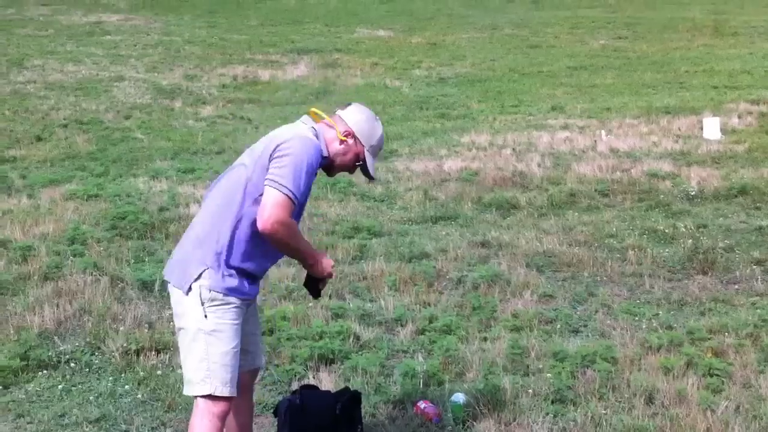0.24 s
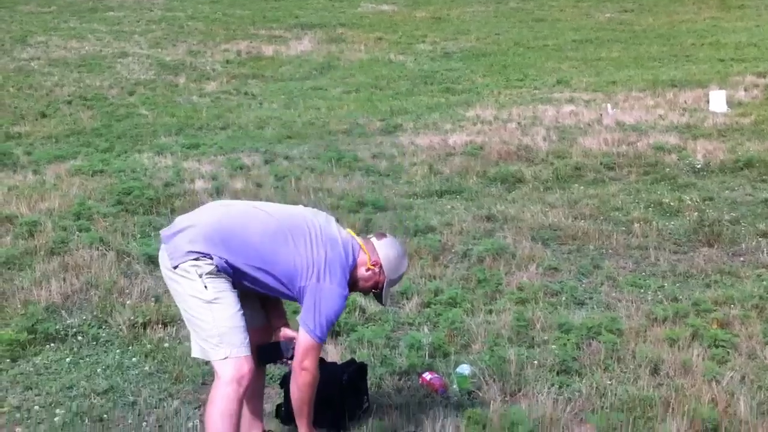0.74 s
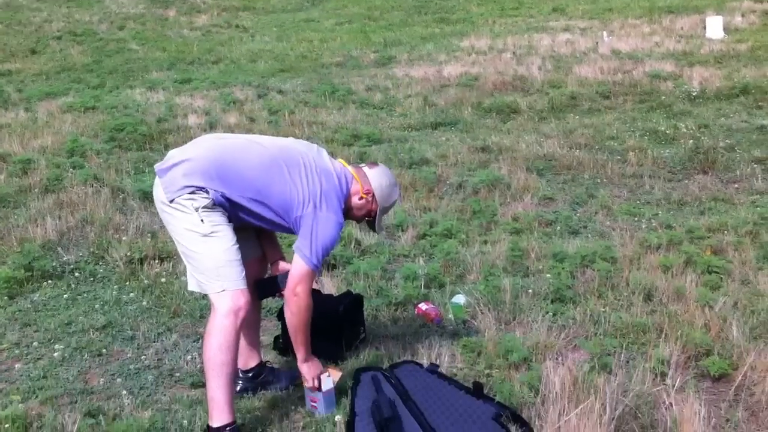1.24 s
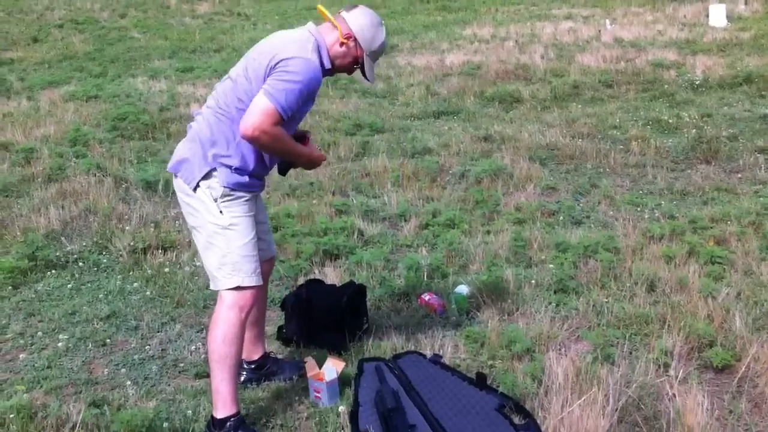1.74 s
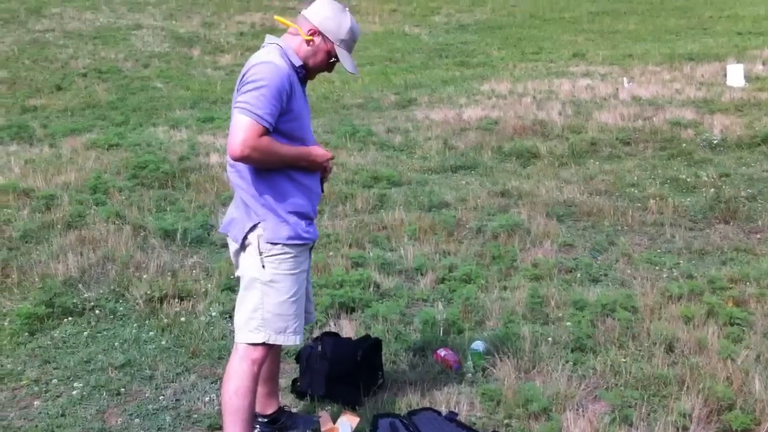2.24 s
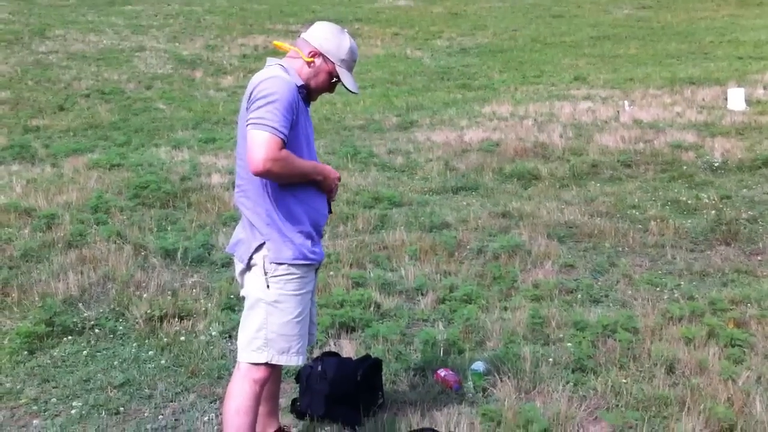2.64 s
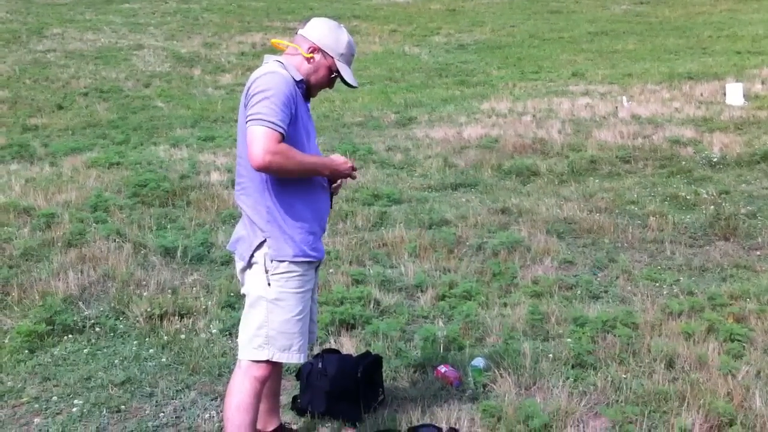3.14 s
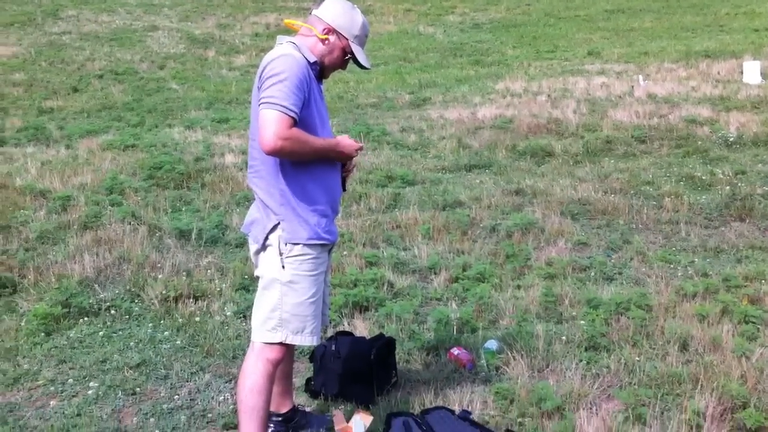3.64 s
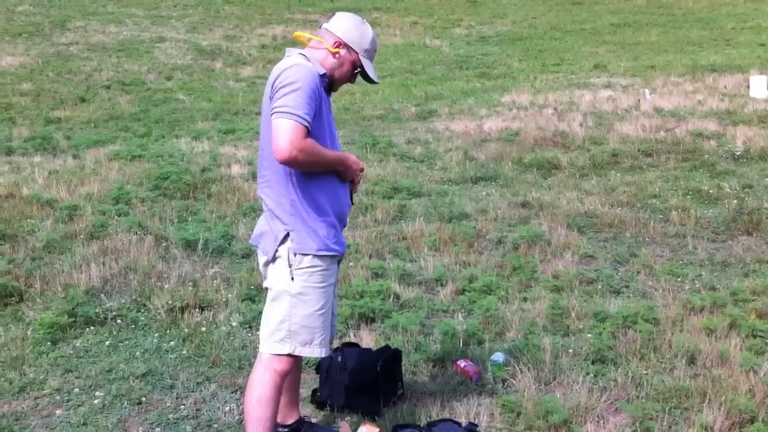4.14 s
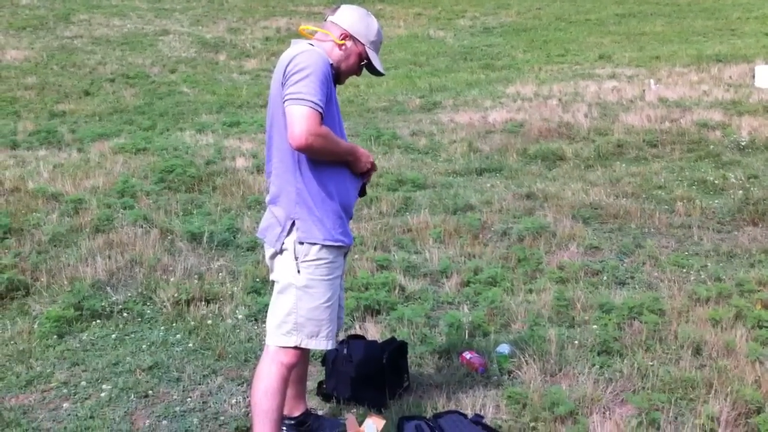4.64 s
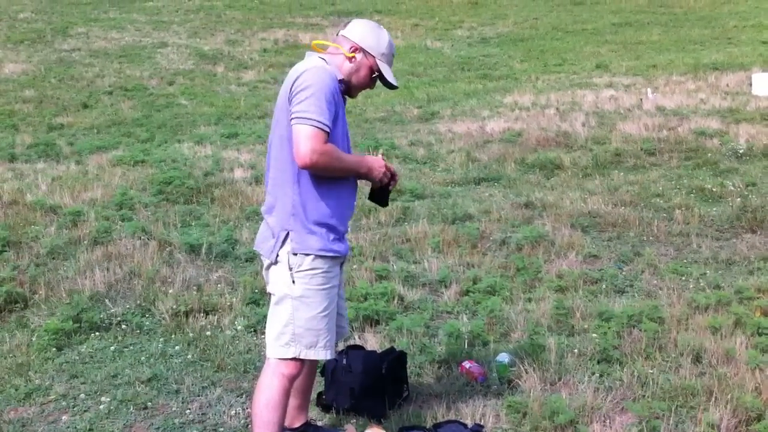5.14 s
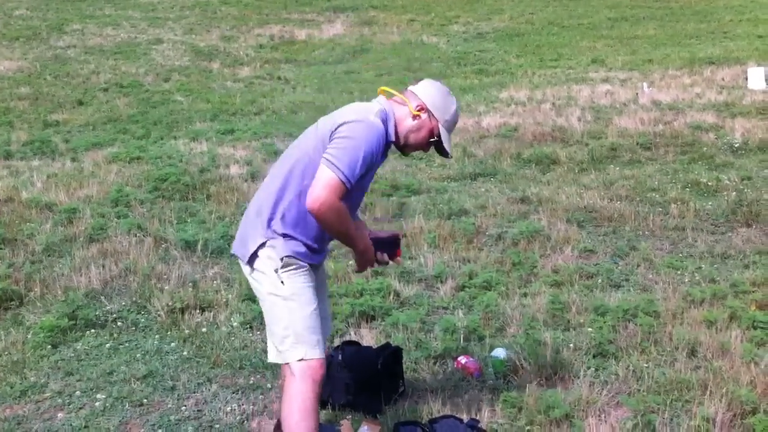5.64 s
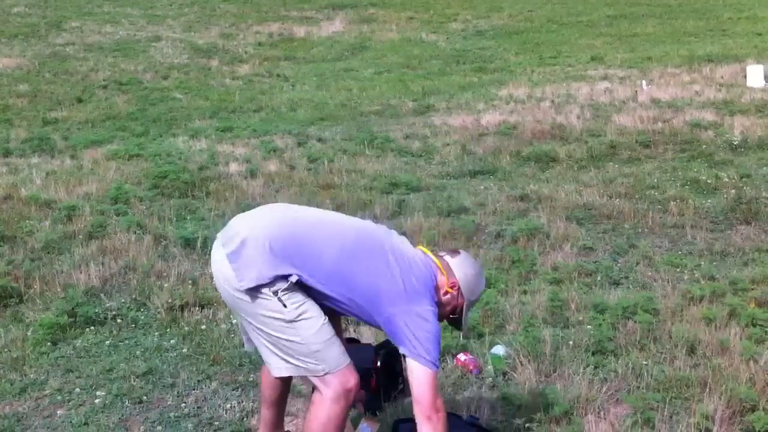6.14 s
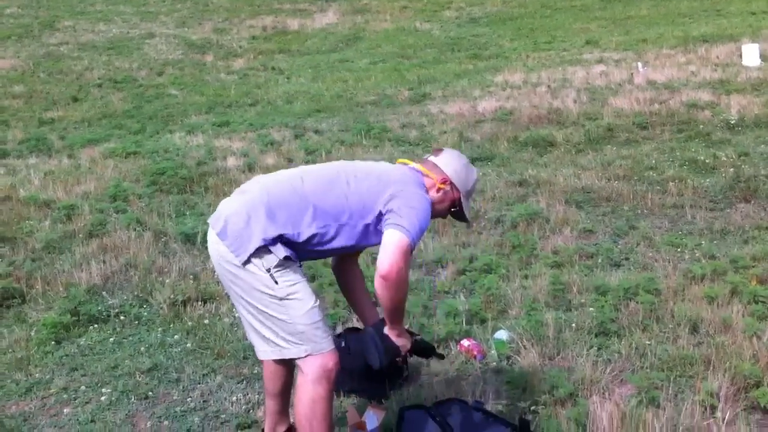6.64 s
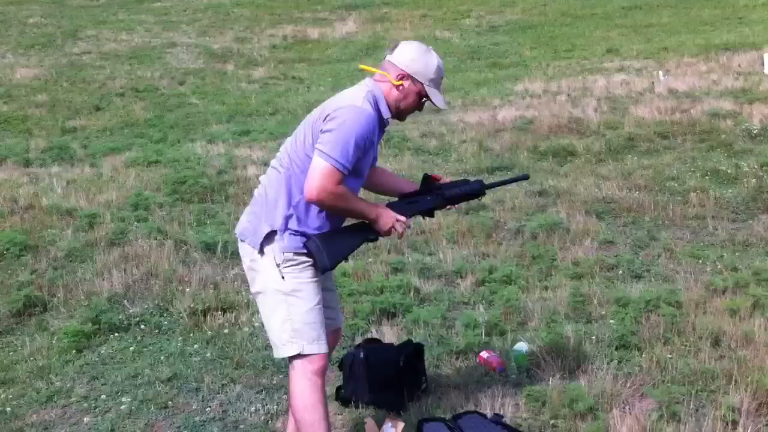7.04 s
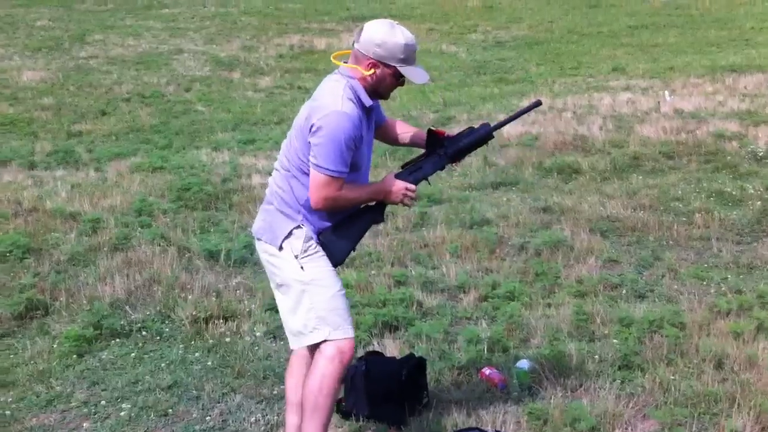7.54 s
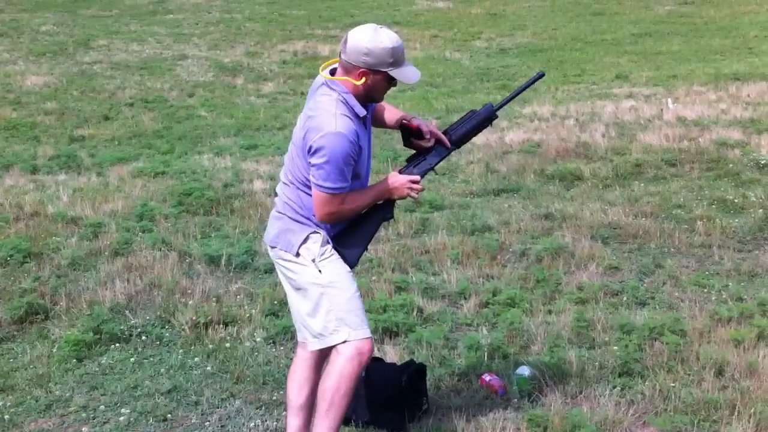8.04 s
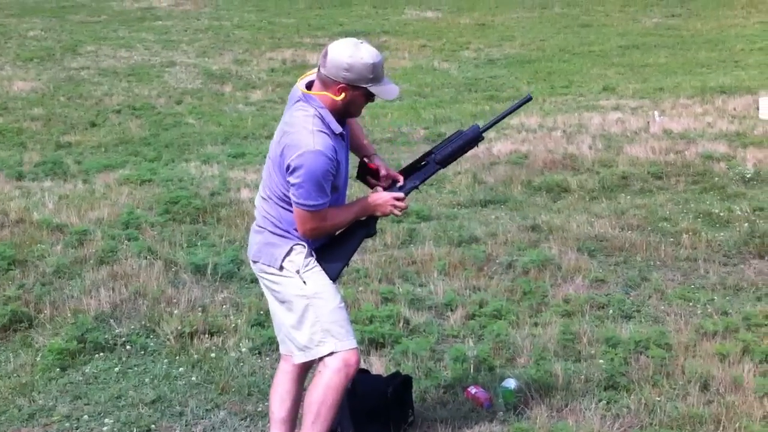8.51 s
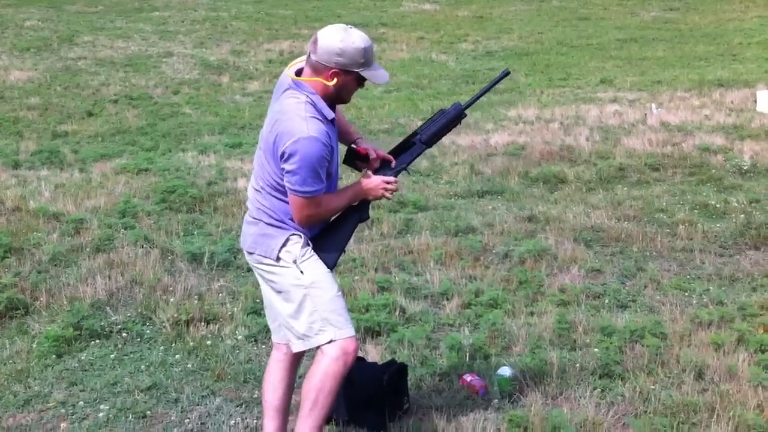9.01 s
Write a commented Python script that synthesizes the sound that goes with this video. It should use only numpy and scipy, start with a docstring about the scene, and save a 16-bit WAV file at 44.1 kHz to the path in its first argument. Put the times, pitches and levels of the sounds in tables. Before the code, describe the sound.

A quiet open field, with softly moving air, thin steady high hiss and faint distant birds: two-note calls and chirps in the first two seconds, repeated rising notes from about 3.3 to 5.5, then a quickening run of high whistles from 5.7 to about 7.5. Shells snap into a box magazine at 0.23 and 0.39. Fingers rummage and tap in a cardboard carton from 0.9 to 1.3. After a lull, light ticks at 2.4 lead to a dull press at 2.7 and crisp snaps at 2.9 and 3.06. Small fiddling ticks run from 3.9 to 4.8, with a final snap at 4.97. Grass and clothes brush from 5.0 to 6.8, with a soft foot thud near 6.0, and again at 7.2. From 8.43 the magazine grates into a gun with metallic clicks and a bright ping, clacking loudest at 8.64; more scraping follows at 8.8 and 9.1, and a second firm clack at 9.21. Close, dry, barely any echo.

```python
"""Loading a box magazine in a field

A man presses shotgun shells into a box magazine: each rubs past the lips and snaps home.
He takes a shell from a carton, shifts in the grass, and works the magazine into a gun with scrapes and clacks.
Blows excite damped modes; rubs are trains of stick-slip impulses filtered by a body's impulse response.
Birds are gliding sinusoids blurred by scattering; moving air and a thin steady hiss are filtered noise."""
import sys
import numpy as np
from scipy import signal
from scipy.fft import rfft, irfft
from scipy.io import wavfile
from scipy.ndimage import map_coordinates

SR = 44100
rng = np.random.default_rng(int(sys.argv[2]) if len(sys.argv) > 2 else 0)


def materialize(psi):
    """Save the field psi as 16-bit PCM at rate SR to the path in sys.argv[1].

    A 1-D psi becomes a single channel; in a 2-D psi each row is a channel.
    """
    bounded = np.clip(np.atleast_2d(psi).T, -1, 1)
    quanta = np.round(bounded * 32767).astype(np.int16)
    wavfile.write(sys.argv[1], SR, quanta)


N = 408807
TIME = np.arange(N) / SR  # the whole scene [s]
RING = np.arange(4096) / SR  # time after one blow [s]


def undb(db):
    """Amplitude ratio: 20 dB is a factor of ten."""
    return 10 ** (np.asarray(db) / 20)


def unit(x):
    """Normalisation to a root-mean-square value of 1."""
    return x / np.sqrt(np.mean(x ** 2) + 1e-30)


def add(out, s, x):
    """Superposition: mix x into out from time s, trimmed at both ends of the scene."""
    i = int(s * SR)
    x, i = x[max(-i, 0):], max(i, 0)
    out[i:i + len(x)] += x[:max(N - i, 0)]


def colour(x, points):
    """Linear filtering by a spectrum of points (frequency [Hz], gain [dB]), joined on a log-frequency axis."""
    hz, db = np.transpose(points)
    f = np.fft.rfftfreq(len(x), 1 / SR) + 1
    gain = undb(np.interp(np.log(f), np.log(hz), db))
    return irfft(rfft(x) * gain, len(x))


def walk(n, rate):
    """Slow fluctuation: random values, rate of them per second, joined smoothly; spread near 1."""
    steps = rng.standard_normal(4096)
    return map_coordinates(steps, [np.arange(n) * rate / SR], order=2, mode="wrap")


def ring(modes, bright, spot_hz, spot_db, rattle_db, rattle_t60_s):
    """Modal impact: a blow excites damped modes, struck again by a short chatter of loose parts."""
    tone = 0
    for hz, width, db in modes:
        # where the body is struck decides which modes speak
        spot = np.exp(-(np.log2(hz / spot_hz) / 0.18) ** 2)
        # harder contact favours the high modes (bright in dB per octave)
        gain = undb(db + bright * np.log2(hz / 2000) + spot_db * spot)
        # the grip shifts each mode a little
        hz = hz * (1 + 0.003 * rng.standard_normal())
        decay = np.exp(-np.pi * width * RING)
        tone = tone + gain * width * decay * np.sin(2 * np.pi * (hz * RING + rng.random()))
    tone = tone * (1 - np.exp(-RING / 0.00015))  # the contact takes a moment to build
    chatter = rng.standard_normal(len(RING)) * np.exp(-np.log(1000) * RING / rattle_t60_s)
    rattle = signal.fftconvolve(tone, chatter)[:len(RING)]
    return unit(tone) + undb(rattle_db) * unit(rattle)


def knocks(table, modes, spot_db, rattle_db, rattle_t60_s):
    """Impacts on one body, each scaled by its energy as if spread over 4 ms."""
    out = np.zeros(N)
    for s, db, bright, spot_hz in table:
        blow = ring(modes, bright, spot_hz, spot_db, rattle_db, rattle_t60_s)
        add(out, s, undb(db) * blow * np.sqrt(.004 * SR / np.sum(blow ** 2)))
    return out


def touches(table):
    """Contact hardness: light blows (time, level, favoured frequency) ring brighter at higher-pitched spots."""
    hardness, neutral_hz = 7.2, 2600  # dB per octave for each octave above the neutral spot
    return [(s, db, hardness * np.log2(max(hz, 700) / neutral_hz), hz) for s, db, hz in table]


def ticks(start, end, rate, db, hz, spread_db, spread_octaves):
    """Random contacts (time, level, favoured frequency) at uneven gaps through a spell."""
    chance = rng.uniform(-0.88, 1, size=(64, 3))
    rows = []
    for k, (when, force, spot) in enumerate(chance):
        s = start + (k + .5 + when / 2) / rate
        rows.append((s, db + spread_db * force, hz * 2 ** (spread_octaves * spot)))
    return [row for row in rows if row[0] < end]


def slips(n, rate, spread_db, catch_db):
    """Stick-slip friction: tiny uneven impulses whose strength swells in bunches."""
    chance, size = rng.random(N)[:n], rng.uniform(-1.13, 1, N)[:n]
    strength = undb(spread_db * np.abs(size) + catch_db * walk(n, 199))
    return (chance < rate / SR) * np.sign(size) * strength


def rubs(table, body, rate, spread_db, catch_db, swell):
    """Friction strokes: slips convolved with a body's impulse response, under a time-varying pressure."""
    out = np.zeros(N)
    for start, peak, end, db, bright in table:
        t = np.arange(start, max(end, start + .01), 1 / SR)
        # each new hold retunes the body a little
        grip = 1 + 0.029 * rng.standard_normal()
        response = np.interp(RING * grip, RING, body, right=0)
        scrape = signal.fftconvolve(slips(len(t), rate, spread_db, catch_db), response)[:len(t)]
        scrape = colour(scrape, [(250, -3 * bright), (16000, 3 * bright)])  # six octaves
        pressure = np.interp(t, [start, peak, end], [0, 1, 0]) ** swell
        add(out, start, undb(db) * unit(scrape) * pressure)
    return out


def background():
    """Shaped noise: softly moving air, slowly wandering in level, under an even high hiss."""
    # spectrum of the moving air: (frequency [Hz], level [dB])
    air_spectrum = [(15, -68), (25, -25.5), (33, -25), (80, -18), (104, -6.5), (177, 0.5), (511, -8),
                    (716, -11.5), (911, -10), (1130, -14), (1410, -13), (1970, -15), (2230, -15),
                    (2900, -16.5), (8000, -21.5), (10400, -44.5), (17600, -120)]
    # spectrum of the thin hiss: (frequency [Hz], level [dB])
    hiss_spectrum = [(6500, -20), (8000, -14), (8900, -9.5), (9650, 0), (10400, -8.5), (11200, -14),
                     (12500, -11), (13400, -9), (15800, -9)]
    air_db, hiss_db = -64, -64.5
    air = unit(colour(rng.standard_normal(N), air_spectrum))
    air = air * undb(air_db + 0.13 * walk(N, 2.5) + .5 * walk(N, 12))
    return air + undb(hiss_db) * unit(colour(rng.standard_normal(N), hiss_spectrum))


def song(count):
    """Geometric approach: the gap and pitch of high whistles close in on last values by the same share each note."""
    start_s, first_gap_s, last_gap_s, shrink = 5.735, .345, .09, .7
    first_hz, last_hz = 4110, 3670
    duty = 0.62  # share of each gap that is sung
    glide_hz, glide_step_hz = 170, -37  # early notes rise; later ones fall more and more
    peak_db, peak_s, fade_db_per_s = -64, 6.95, 9  # swells towards the peak and fades after it
    notes, s = [], start_s
    for k in range(count):
        left = shrink ** k
        gap = last_gap_s + (first_gap_s - last_gap_s) * left
        hz = last_hz + (first_hz - last_hz) * left
        glide = glide_hz + glide_step_hz * k
        shape = [(0, hz - glide / 2), (duty * gap, hz + glide / 2)]
        notes.append((s, shape, peak_db - fade_db_per_s * abs(s - peak_s)))
        s += gap
    return notes


def upslurs(count):
    """Slowing repetition: one rising note recurs, each gap a little longer than the last."""
    # pitch contour of the rising note: (time after its start [s], frequency [Hz])
    rising_note = [(0, 2026), (.02, 2145), (.04, 2520), (.06, 2760)]
    start_s, gap_s, slowing_s, db = 3.256, .358, .008, -59.5  # slowing is added to each further gap
    return [(start_s + k * (gap_s + slowing_s * (k - 1) / 2), rising_note, db) for k in range(count)]


def birds():
    """Frequency modulation: far whistles are wavering gliding sinusoids, smeared by scattering over the field."""
    # two-note calls, low sliding up to high: (time [s], level of the high note [dB])
    two_note_calls = [(-.07, -64.5), (.266, -59.5), (.688, -57), (1.208, -58.5)]
    # contours of their two notes: (time after the call's start [s], frequency [Hz])
    low_note = [(0, 2780), (.04, 2700), (.068, 2850)]
    high_note = [(.052, 2990), (.08, 3156), (.146, 3210)]
    low_note_db = -6.5  # against the high note
    # contour of a chirp that rises and drops: (time after its start [s], frequency [Hz])
    chirp_shape = [(0, 2053), (.035, 2380), (.048, 2048), (.075, 1780)]
    # its repeats: (time [s], level [dB])
    chirps = [(.085, -64), (.487, -62), (.94, -65), (1.48, -65)]
    # contour of a low, slightly sagging note: (time after its start [s], frequency [Hz])
    low_whistle = [(0, 1741), (.075, 1669)]
    # its repeats: (time [s], level [dB])
    low_whistles = [(3.41, -69), (4.019, -67), (4.33, -67), (4.5, -66), (4.89, -67), (5.69, -66.5)]
    # short gliding whistles and, in the last row, a faint brief tone near 2.2 kHz:
    # (time [s], first frequency [Hz], glide [octaves], level [dB])
    brief_tones = [(6.11, 3090, .14, -63), (6.22, 2100, .09, -64.5), (6.28, 2620, -0.14, -59.5),
                   (6.42, 3135, 0.076, -61.5), (6.51, 2060, .06, -70), (8.035, 2090, 0.096, -69),
                   (8.36, 2220, .04, -64)]
    brief_tone_s = .058

    notes = song(count=13) + upslurs(count=7)
    for s, db in two_note_calls:
        notes += [(s, low_note, db + low_note_db), (s, high_note, db)]
    notes += [(s, chirp_shape, db) for s, db in chirps]
    notes += [(s, low_whistle, db) for s, db in low_whistles]
    notes += [(s, [(0, hz), (brief_tone_s, hz * 2 ** octaves)], db) for s, hz, octaves, db in brief_tones]
    out = np.zeros(N)
    for s, shape, db in notes:
        when, pitch = np.transpose(shape)
        n = int((when[-1] - when[0]) * SR)
        hz = np.interp(when[0] + TIME[:n], when, pitch) * (1 + .008 * walk(n, 220))
        flutter = undb(db + 2.1 * walk(n, 114)) * signal.windows.tukey(n, .5)
        add(out, s + when[0], flutter * np.sin(2 * np.pi * np.cumsum(hz) / SR))
    # nearby grass blurs each note; distant trees leave a longer tail
    t = TIME[:SR]
    scatter = rng.standard_normal(SR) * (np.exp(-t / 0.016) + 0.26 * np.exp(-t / 0.25))
    blurred = signal.fftconvolve(out, scatter / np.linalg.norm(scatter))[:N]
    return undb(-2.5) * out + undb(-1.5) * blurred


def grass():
    """Dense friction: stalks and cloth brush in many small slips as he shifts his weight, with one foot thud."""
    # shoes and clothes brushing, and a short foot thud at 5.98 s that is cut off at its end while still rising:
    # (start [s], time the pressure rises towards [s], end [s], level [dB], brightness [dB per octave])
    brushes = [(5.04, 5.2, 5.28, -53.5, -1.5), (5.24, 5.32, 5.42, -56.5, -2), (5.5, 5.75, 6.2, -66.5, 4),
               (5.98, 6.015, 6, -48, -1.5), (5.94, 6.06, 6.17, -53.5, 1), (6.2, 6.36, 6.8, -63, 2),
               (7.14, 7.25, 7.49, -54.5, 2)]
    # spectrum of shoes and cloth in dry grass: (frequency [Hz], level [dB])
    grass_spectrum = [(80, -29), (180, 0.5), (290, -0.5), (420, 4.5), (650, -8.5), (1100, -5), (1700, -9.5),
                      (2300, -6), (4500, -13.5), (6500, -23.5), (10000, -16), (15000, -31)]
    stalk = colour(signal.unit_impulse(len(RING), idx=256), grass_spectrum)
    return rubs(brushes, stalk, rate=3500, spread_db=9.5, catch_db=1.0, swell=0.84)


def carton():
    """Small radiator: fingers rummage in a cardboard box and lift a shell; the box gives no deep bass."""
    # resonances of the shell carton: (frequency [Hz], width [Hz], level [dB])
    carton_modes = [(292, 120, 0.5), (955, 130, 1.5), (1420, 240, -1.5), (2250, 470, -5.5), (3350, 480, -3),
                    (4380, 210, -5.5), (8200, 2400, -14.5)]
    # shells tapping the carton: (time [s], level [dB], frequency favoured by the struck spot [Hz])
    taps = [(1.0506, -39, 3400), (1.074, -37.5, 4520), (1.062, -53, 3200), (1.0765, -45.5, 280),
            (1.088, -42.5, 3400), (1.094, -46.5, 280), (1.1115, -51, 2300)]
    # spells of rummaging: (start [s], strongest [s], end [s], level [dB], brightness [dB per octave])
    rummages = [(.86, 0.959, 1.03, -57, -.5), (1.015, 1.068, 1.156, -53, -.5),
                (1.149, 1.221, 1.32, -63, 2.5)]
    tick_rate, tick_db, tick_hz = 28, -55.5, 2000  # loose shells touch as the fingers stir them; per second
    body = ring(carton_modes, 0, spot_hz=1210, spot_db=4, rattle_db=3, rattle_t60_s=0.051)
    blows = touches(taps)
    for start, peak, end, db, bright in rummages:
        stirred = ticks((start + peak) / 2, (peak + end) / 2, tick_rate, tick_db, tick_hz,
                        spread_db=4, spread_octaves=.6)
        blows += touches(stirred)
    box = knocks(blows, carton_modes, spot_db=11.5, rattle_db=-5, rattle_t60_s=0.027)
    box = box + rubs(rummages, body, rate=420, spread_db=19, catch_db=2, swell=0.59)
    return signal.sosfilt(signal.butter(2, 150, "high", fs=SR, output="sos"), box)


def gun():
    """Coupled resonators: the magazine grates along the well, flicks the catch spring, strikes home and rebounds."""
    # resonances of the gun's receiver: (frequency [Hz], width [Hz], level [dB])
    receiver_modes = [(401, 44, -23), (481, 49, -8.5), (777, 27, -12.5), (836, 57, -12), (1030, 80, -16),
                      (1260, 260, -12), (1497, 320, -9), (2177, 350, -2.5), (2320, 140, -9.5),
                      (2620, 280, -6), (2830, 81, -11), (3100, 230, -11.5), (3890, 180, -8),
                      (4580, 160, -11), (5700, 630, -18.5), (7900, 1400, -19), (9000, 570, -19),
                      (10350, 530, -15), (11660, 1000, -16), (14200, 1200, -28)]
    # resonances of the magazine wall sliding in the well: (frequency [Hz], width [Hz], level [dB])
    wall_modes = [(480, 54, -2), (780, 43, -12), (893, 70, 0.5), (1150, 115, -24), (1620, 110, -10),
                  (2347, 68, 6.5), (2580, 76, -2), (2877, 93, 3.5), (3174, 100, -1.5), (3900, 150, -9),
                  (4660, 610, -4.5), (5700, 160, -14.5), (7780, 650, -13.5), (9180, 290, -5),
                  (10100, 460, -8.5), (12000, 500, -11), (13800, 1200, -17)]
    # lighter metal blows: (time [s], level [dB], frequency favoured by the struck spot [Hz])
    clicks = [(8.428, -33, 3600), (8.4445, -32, 3180), (8.505, -32, 2620), (8.5352, -39, 1320),
              (8.560, -35, 3400), (8.629, -30, 1900), (8.6724, -44, 2200), (8.808, -46, 1890),
              (8.883, -32.5, 2800), (8.9453, -41.5, 3800), (8.990, -50, 2700), (9.008, -46, 3400),
              (9.1388, -30, 4300), (9.160, -32, 3480)]
    # the magazine latches:
    # (time [s], level [dB], brightness [dB per octave], frequency favoured by the struck spot [Hz])
    latches = [(8.6392, -10, 1.5, 2250), (9.214, -15.5, 0, 2180)]
    # strokes of the magazine in the well, and one faint rub of the hand (at 8.92 s):
    # (start [s], strongest [s], end [s], level [dB], swell exponent [1]: low is even pressure, high is peaked)
    strokes = [(8.432, 8.465, 8.521, -31, .35), (8.553, 8.587, 8.655, -28.5, .8),
               (8.795, 8.884, 8.932, -28.5, 1.2), (8.92, 9.06, 9.2, -58, .5),
               (9.082, 9.114, 9.135, -27, 1.1), (9.133, 9.16, 9.179, -30.5, .9),
               (9.188, 9.205, 9.24, -41, .9)]
    # pings of the catch spring: (time [s], level [dB])
    pings = [(8.445, -26), (8.505, -18)]
    ping_hz, ping_t60_s = 9490, 0.027
    rebound_s, rebound_db, rebound_bright = .008, -19.5, -4  # one weaker, duller rebound (dB per octave)
    stroke_bright = .1  # dB per octave
    grit_per_s, grit_db, grit_hz = 130, -11, 2880  # small catches in mid-stroke; dB against the stroke
    receiver_db = -5.5  # the receiver rings along with the sliding wall

    blows = touches(clicks)
    for s, db, bright, hz in latches:
        blows += [(s, db, bright, hz),
                  (s + rebound_s, db + rebound_db, bright + rebound_bright, hz)]
    out = np.zeros(N)
    for start, peak, end, db, swell in strokes:
        wall = ring(wall_modes, bright=0.7, spot_hz=2870, spot_db=2, rattle_db=-2.5, rattle_t60_s=0.022)
        receiver = ring(receiver_modes, bright=0, spot_hz=480, spot_db=7, rattle_db=-1.5, rattle_t60_s=0.026)
        body = wall + undb(receiver_db) * receiver
        stroke = [(start, peak, end, db, stroke_bright)]
        out += undb(-2.0) * rubs(stroke, body, rate=1500, spread_db=12.5, catch_db=3.5, swell=swell)
        grit = ticks((start + peak) / 2, (peak + end) / 2, grit_per_s, db + grit_db, grit_hz,
                     spread_db=-2.5, spread_octaves=0.55)
        blows += touches(grit)
    out += knocks(blows, receiver_modes, spot_db=6.2, rattle_db=2.5, rattle_t60_s=0.03)
    for s, db in pings:
        decay = np.exp(-np.log(1000) * RING / ping_t60_s)
        add(out, s, undb(db) * np.sin(2 * np.pi * ping_hz * RING) * decay)
    return out


def magazine():
    """Friction then impact: hulls slide under the lips, snap down on the spring, seat and settle; fingers fiddle."""
    # resonances of the loaded magazine: (frequency [Hz], width [Hz], level [dB])
    magazine_modes = [(342, 87, -9.5), (453, 55, -4.5), (850, 102, 1), (978, 84, 0.5), (1205, 100, 2.5),
                      (1608, 143, 6), (2164, 340, -2.5), (2386, 170, -3.5), (2836, 140, 1), (3450, 510, -5),
                      (4020, 350, -5), (4700, 1100, -8), (5660, 820, -14.5), (9000, 820, -12),
                      (10700, 4500, -8), (13400, 950, -22)]
    # shells pressed home: (time of the snap [s], level [dB], brightness [dB per octave],
    # frequency favoured by the struck spot [Hz], seating blow level [dB], its favoured frequency [Hz],
    # settling tick level [dB], rub level [dB], rub before the snap [s], rub after it [s])
    presses = [(0.2294, -34, -.5, 2570, -45, 1600, -48, -46, 0.021, 0.044),
               (.3865, -29, 3.5, 2920, -32, 960, -48, -45.5, .016, 0.065),
               (2.6865, -44, -3, 1200, -56, 2693, -49, -39.5, .011, 0.052),
               (2.911, -24.5, -1.5, 2830, -31, 1200, -44, -43, 0.016, 0.044),
               (3.0639, -27, 1, 4170, -25.5, 1370, -59, -46.5, .024, 0.033),
               (4.9688, -31.5, 2.5, 1600, -32, 2260, -75, -47.5, 0.017, .016)]
    # light knocks of shells and fingers: (time [s], level [dB], frequency favoured by the struck spot [Hz])
    handling_knocks = [(.039, -50, 2400), (2.4235, -51.5, 1300), (2.613, -49.5, 1600), (2.8246, -53, 2200),
                       (2.900, -41, 1310), (3.9795, -49, 1650), (4.0917, -49, 1420), (4.192, -57, 2380),
                       (4.2967, -61.5, 4000), (4.434, -52.5, 2100), (4.443, -50.5, 2300),
                       (4.467, -51, 4750), (4.479, -55, 4330), (4.5956, -52, 2000), (4.66, -54, 1950),
                       (4.8425, -46, 1290), (4.852, -49.5, 1980), (5.3468, -53.5, 4260),
                       (6.2947, -52.5, 2200), (6.954, -41.5, 1193), (6.962, -52, 2420)]
    # spells of fiddling with the shells:
    # (start [s], end [s], ticks [per s], level [dB], middle favoured frequency [Hz])
    fiddling = [(2.348, 2.45, 25, -61, 1920), (3.9, 4.75, 12, -60.5, 2390), (5.051, 5.35, 14, -57.5, 2870)]
    seat_s, seat_bright = .0034, -1.9  # the hull seats just after the rim snaps in; dB per octave
    settle_s, settle_hz = .02, 2500  # then the stack settles on the spring
    rub_peak_share, rub_bright = 0.32, .7  # strongest this share of the way through; dB per octave
    rustle_db, rustle_bright = -6.5, -3.1  # soft, dull, faint rustle: dB against the ticks, dB per octave

    body = ring(magazine_modes, 0, spot_hz=2470, spot_db=6.5, rattle_db=-6, rattle_t60_s=0.024)
    blows, slides = touches(handling_knocks), []
    for s, db, bright, hz, seat_db, seat_hz, settle_db, rub_db, before, after in presses:
        blows += [(s, db, bright, hz),
                  (s + seat_s, seat_db, seat_bright, seat_hz),
                  (s + settle_s, settle_db, bright, settle_hz)]
        strongest = s - before + rub_peak_share * (before + after)
        slides.append((s - before, strongest, s + after, rub_db, rub_bright))
    for start, end, rate, db, hz in fiddling:
        blows += touches(ticks(start, end, rate, db, hz, spread_db=2.5, spread_octaves=0.75))
        slides.append((start, (start + end) / 2, end, db + rustle_db, rustle_bright))
    snaps = knocks(blows, magazine_modes, spot_db=11.5, rattle_db=-4, rattle_t60_s=0.025)
    return snaps + rubs(slides, body, rate=1500, spread_db=1, catch_db=2.5, swell=1.0)


def ground(x, lag_s, bounce_db):
    """Two-path interference: the turf returns a dull copy a moment later, which hollows the low middle."""
    dull = signal.sosfilt(signal.butter(1, 3500, fs=SR, output="sos"), x)
    return x + undb(bounce_db) * np.interp(TIME - lag_s, TIME, dull)


def field_echo(x, echo_db, t60_s):
    """Diffuse reverberation: open ground returns only a faint, dull, decaying tail."""
    tail = colour(rng.standard_normal(SR), [(200, 12), (2500, 4), (6000, -1.5), (15000, -48)])
    tail = tail * np.exp(-np.log(1000) * TIME[:SR] / t60_s)
    return undb(echo_db) * signal.fftconvolve(x, tail / np.linalg.norm(tail))[:N]


def scene():
    """Superposition: handling sounds and their reflections in the open, with birds and air behind."""
    # small objects radiate little bass
    high_pass = signal.butter(4, 300, "high", fs=SR, output="sos")
    objects = signal.sosfilt(high_pass, magazine() + gun()) + carton()
    handling = undb(-1.0) * ground(objects, lag_s=0.000804, bounce_db=-13.0) + grass()
    echo = field_echo(handling, echo_db=-25, t60_s=0.14)
    return (handling + echo + birds() + background())[None]


def record(dry):
    """Band limiting: a steep elliptic low-pass removes the top of the treble."""
    top_hz = 15900
    return signal.sosfilt(signal.ellip(10, .2, 70, top_hz, fs=SR, output="sos"), dry)


dry = scene()
out = record(dry)
materialize(out)
```